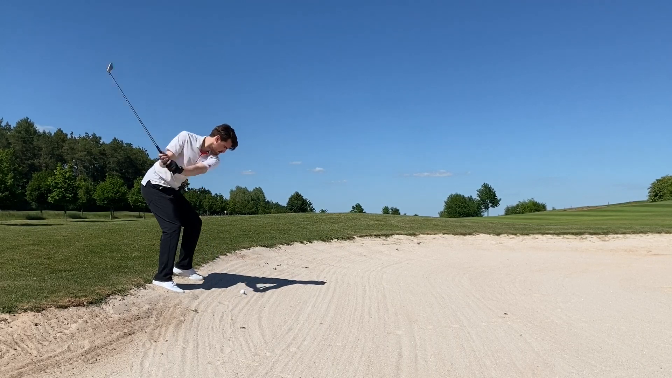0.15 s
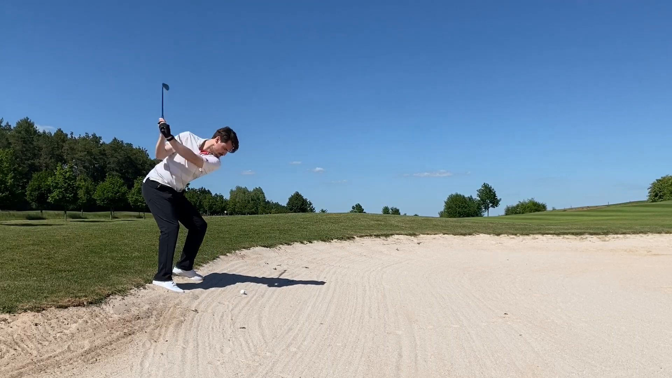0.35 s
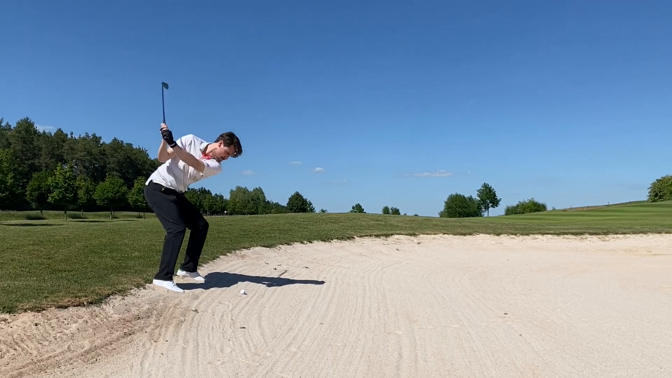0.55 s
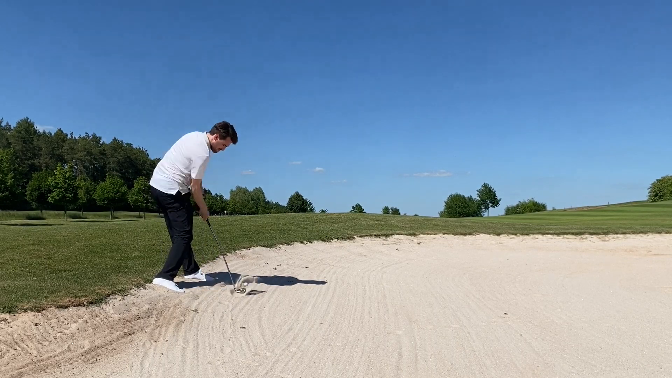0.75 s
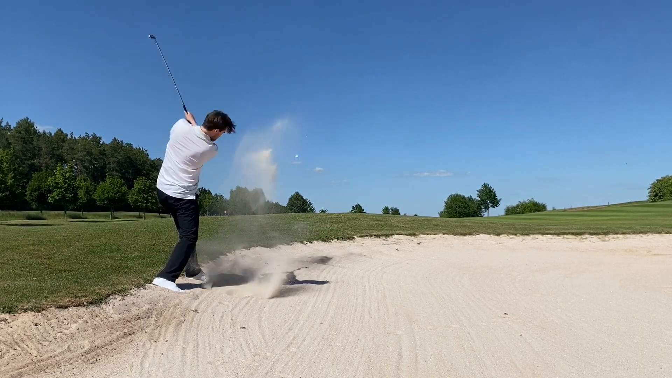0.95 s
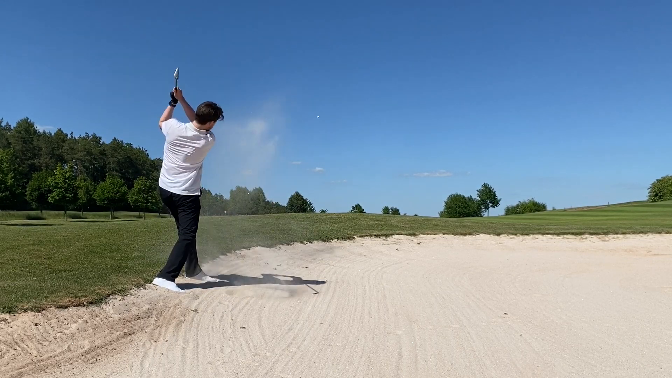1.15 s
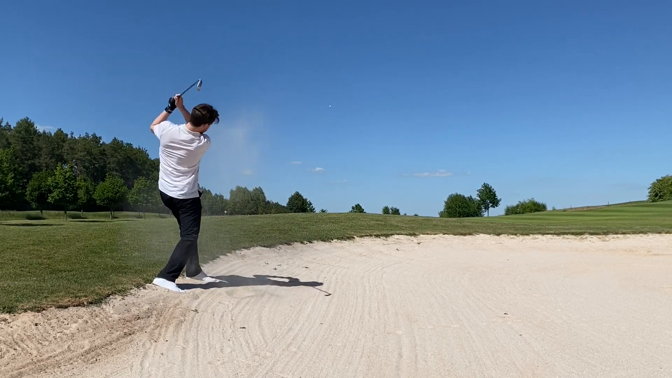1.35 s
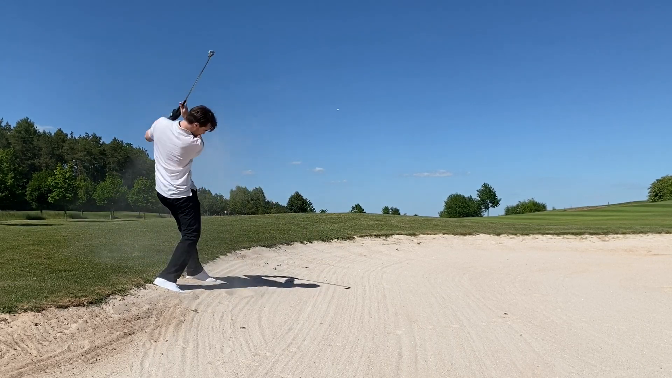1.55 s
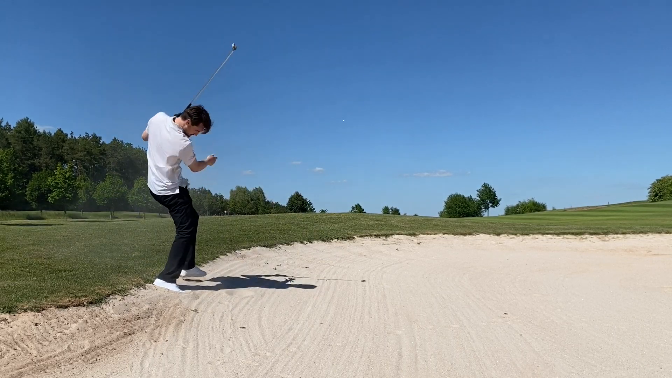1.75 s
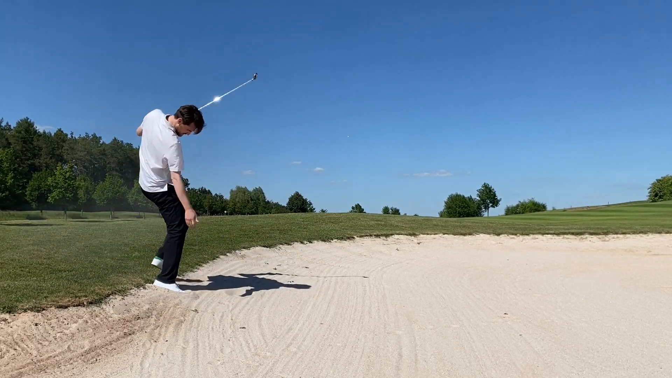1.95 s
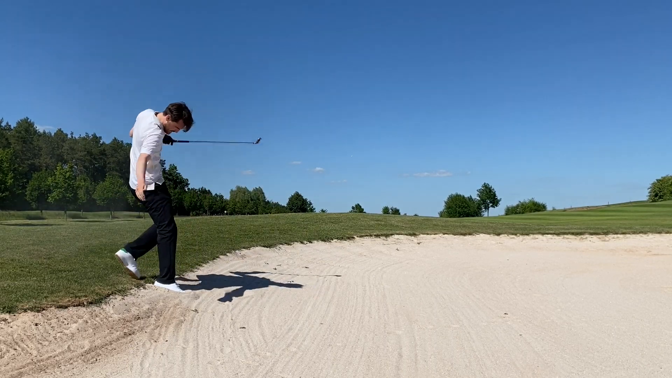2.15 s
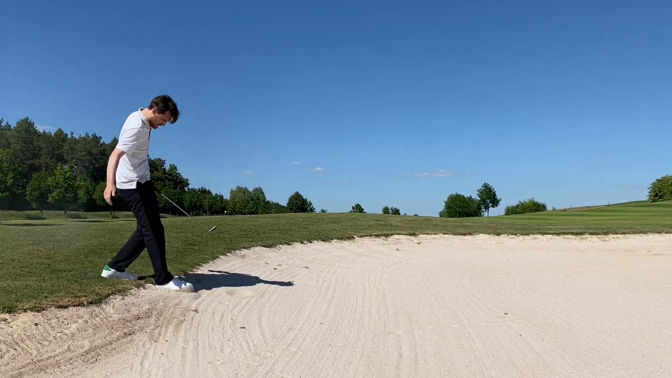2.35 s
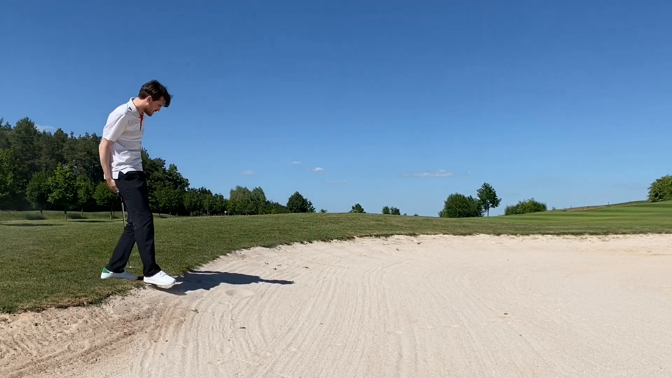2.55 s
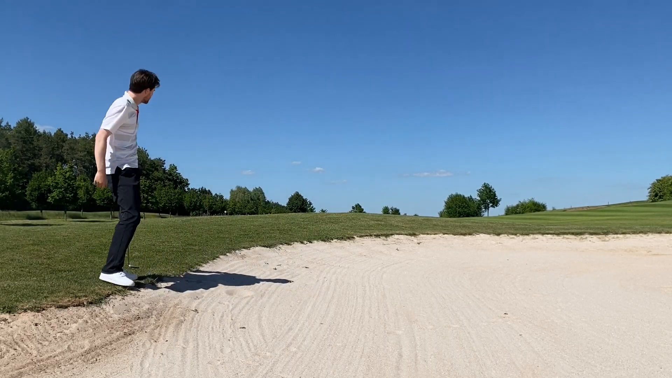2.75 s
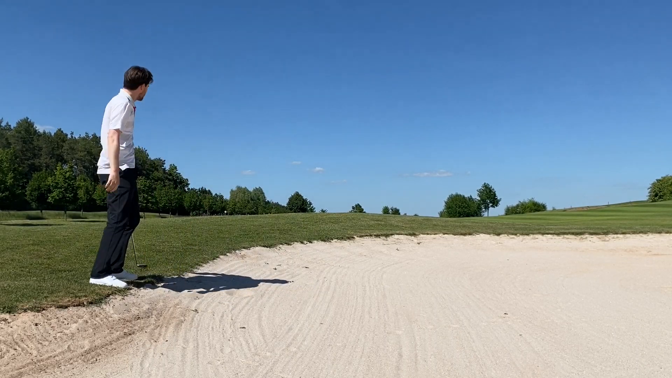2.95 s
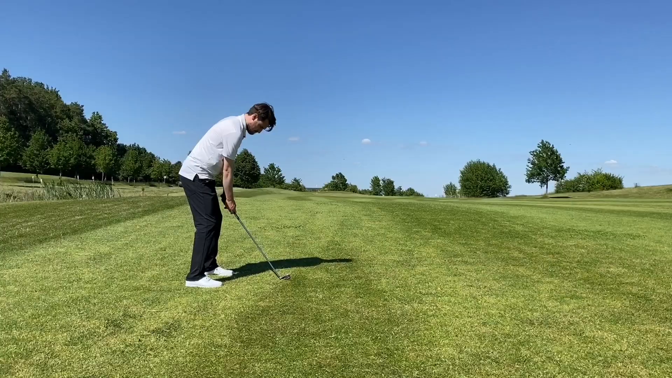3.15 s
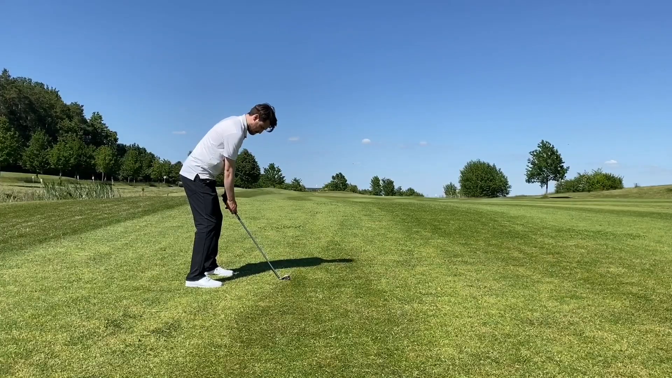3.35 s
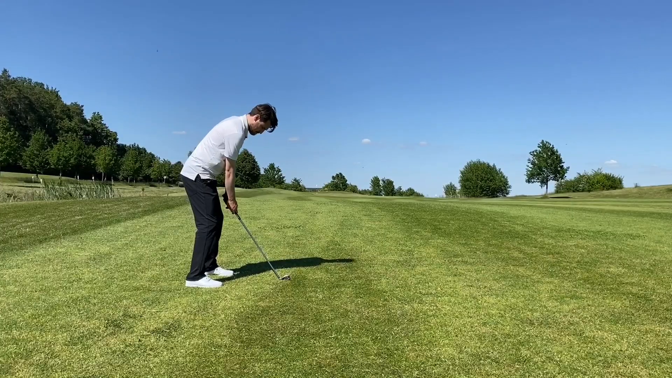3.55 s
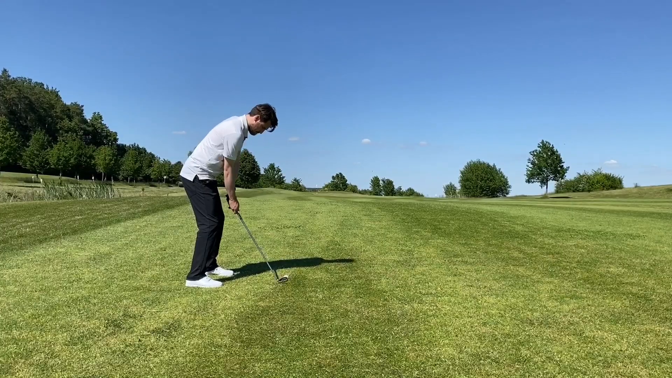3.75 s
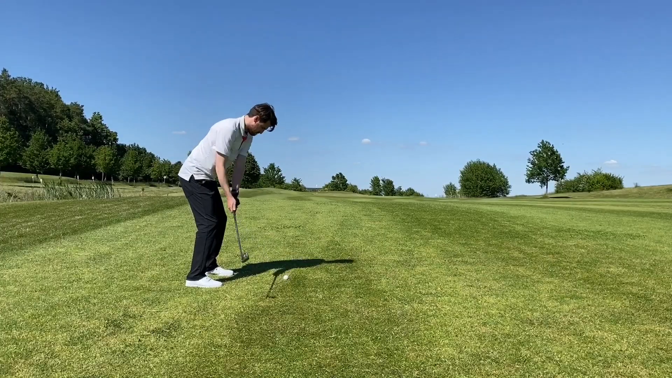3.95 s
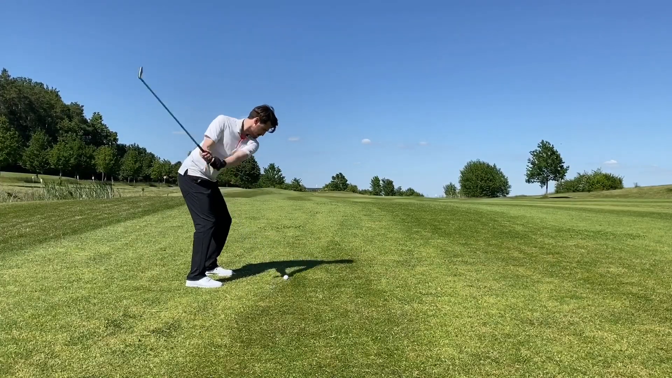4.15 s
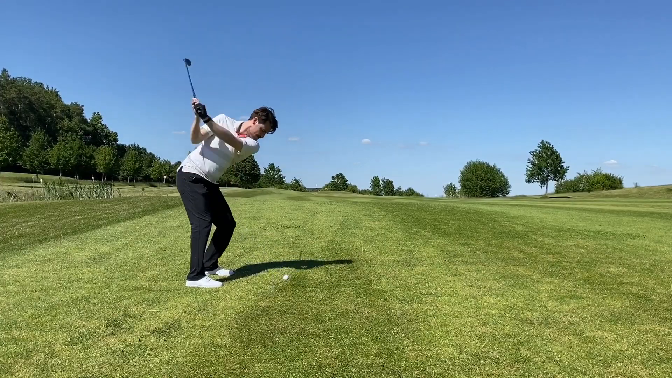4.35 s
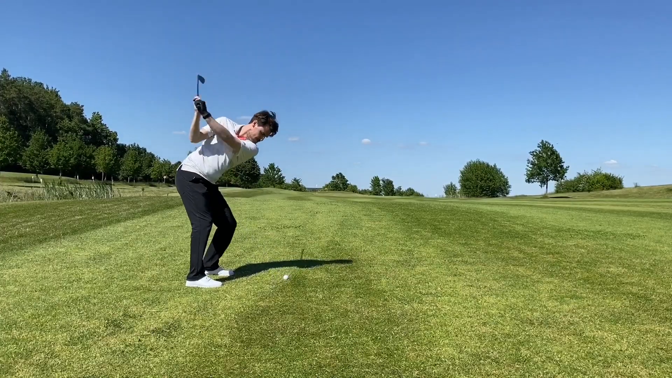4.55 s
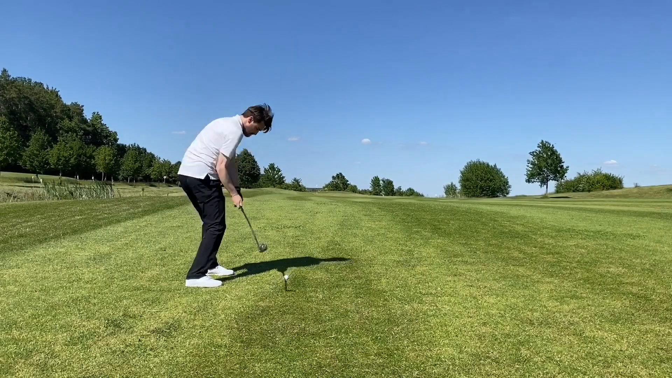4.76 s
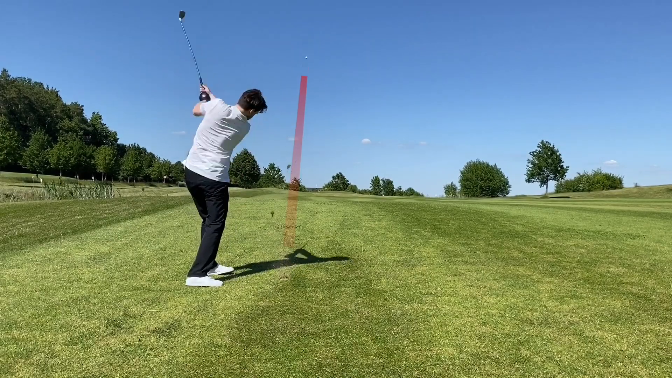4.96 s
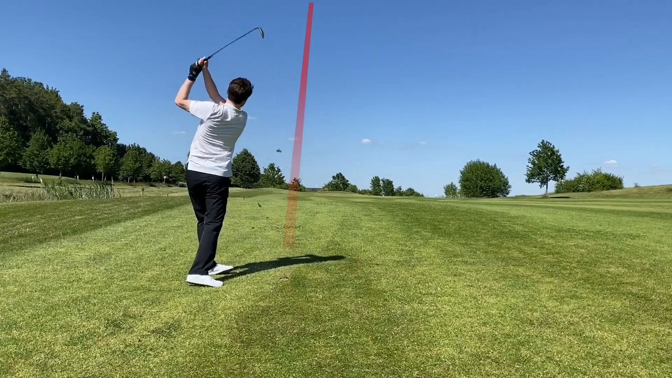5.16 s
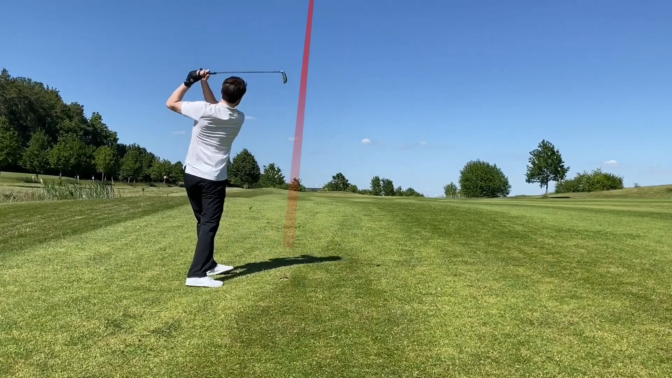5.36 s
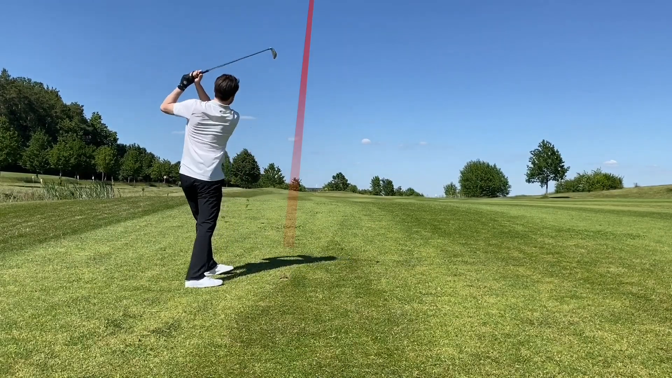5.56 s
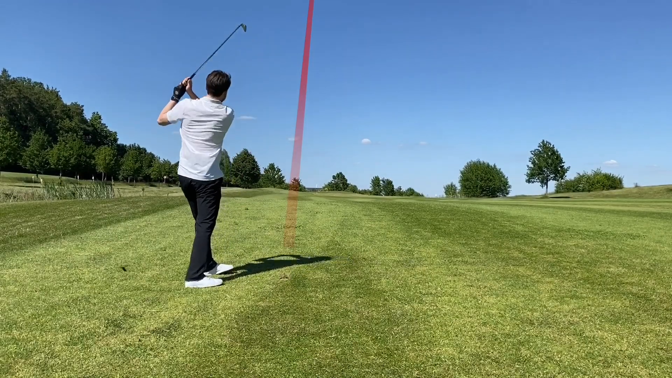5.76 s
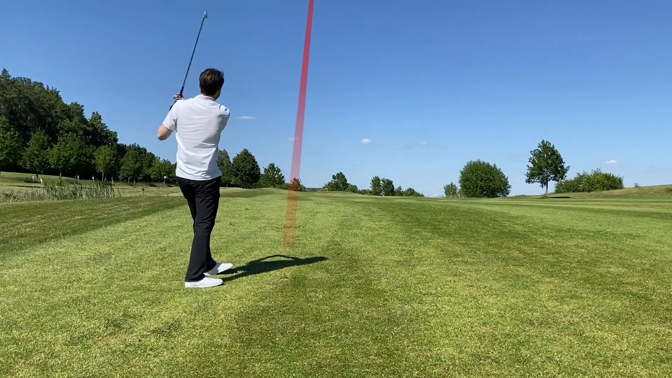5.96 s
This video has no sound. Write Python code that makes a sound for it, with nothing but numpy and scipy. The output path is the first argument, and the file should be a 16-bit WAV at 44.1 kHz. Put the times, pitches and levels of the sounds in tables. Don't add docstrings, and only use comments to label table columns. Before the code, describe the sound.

Two golf shots heard from a few metres away with a handheld stereo microphone. First a short swish and dry clack with a low thud in sand, then falling grains. A muted knock of club on shoe comes midway. Birds whistle and trill faintly over gusting low wind. Finally a louder, brighter click off grass, followed by wind bumps and a light rustle settling into quiet open air.

```python
import sys
import numpy as np
from scipy import signal
from scipy.fft import rfft, irfft, next_fast_len
from scipy.io import wavfile
from scipy.ndimage import uniform_filter1d, map_coordinates

SR = 44100
rng = np.random.default_rng(int(sys.argv[2]) if len(sys.argv) > 2 else 0)


def master(y):
    cut = np.clip(np.atleast_2d(y).T, -1, 1)
    pcm = np.round(cut * 32767)
    wavfile.write(sys.argv[1], SR, pcm.astype(np.int16))


def makeup_ratio(level_db):
    decades = np.asarray(level_db, float) / 20
    return 10 ** decades


N = 264375


def unit(x):
    return x / np.sqrt(np.mean(x ** 2) + 1e-20)


def along(points, hz):
    f, level_db = np.transpose(points)
    return makeup_ratio(np.interp(np.log(hz + 1), np.log(f + 1), level_db, left=-120, right=-120))


def wobble(rate):
    knots = rng.standard_normal(int(N * 100 / SR) + 4)
    return map_coordinates(knots, [np.arange(N) * min(rate, 100) / SR])


def filtered(x, response):
    m = next_fast_len(N + SR // 2)
    return irfft(rfft(x, m) * response(np.fft.rfftfreq(m, 1 / SR)), m)[..., :N]


def grainy(points, spread_db, channels=2):
    raw = rng.standard_normal((channels, N)) * makeup_ratio(spread_db * rng.standard_normal(N))
    return unit(filtered(raw, lambda hz: along(points, hz)))


def add(track, s, piece):
    part = track[round(s * SR):][:len(piece)]
    part += piece[:len(part)]


def trees():
    # (frequency [Hz], level [dB per Hz])
    sand_pit = [(150, -29), (250, -2), (455, -2.5), (619, -13), (1200, -13), (1300, -22.5), (1510, -10),
                (3230, -18.5), (6080, -39), (8000, -38), (12000, -38.5), (15600, -67.5), (22000, -120)]
    open_grass = [(150, -37), (250, -13), (363, -1), (600, -7.5), (740, -9.5), (1640, -22.5), (3080, -19.5),
                  (4770, -23), (6590, -30), (7880, -39), (12000, -42), (15600, -66.5), (22000, -120)]
    at_sand = np.arange(N) < 3.058 * SR
    hiss = np.where(at_sand, makeup_ratio(-2.0) * grainy(sand_pit, 1.5), makeup_ratio(0.5) * grainy(open_grass, 0.55))
    breath_db = 1.2 * wobble(0.8) + 0.55 * wobble(3.2) + 0.8 * wobble(9.2)
    return makeup_ratio(-74.5 + breath_db) * hiss


def wind():
    # (time [s], strength [dB])
    breeze = [(0, -61), (.3, -60.5), (.6, -55.5), (0.781, -54.5), (0.919, -61.5), (1.03, -50.5), (1.3, -56),
              (1.7, -55.5), (1.97, -47.5), (2.55, -51.5), (2.77, -57.5), (3.0, -54.5), (3.5, -44),
              (3.95, -53), (4.4, -52.5), (4.62, -49.5), (5.1, -48), (5.5, -55.5)]
    # (time [s], half width [s], rise [dB], extra rise of the small eddies [dB])
    gusts = [(3.66, .05, 6, -1), (3.745, .05, 7, 11), (4.0, .12, -3, -11), (4.79, .035, 11, -4),
             (4.88, .025, 9, -5), (5.05, .1, 0.5, -7), (5.95, .25, 8, -2), (1.16, .06, -1, -5),
             (4.33, .05, 3, 4), (3.21, .03, 4, 4), (2.9, .07, 0, 2), (1.21, .03, 5, 2), (.67, .03, 4, 0),
             (5.42, .12, -1, -4)]
    # (time [s], peak [dB], width [ms])
    kicks = [(0.224, -43.5, 1.63), (0.259, -47.5, 2.5), (0.279, -54, 1.7), (0.466, -50.5, 1.6),
             (0.478, -46.5, 1.14), (1.378, -50, 1.65), (1.397, -44, 1.53), (1.991, -43.5, 1.2),
             (2.124, -44.5, 1.67), (2.242, -45.5, 1.8), (2.53, -44.5, 1.07), (2.585, -43, 1.28),
             (3.287, -41.5, 1.8), (3.693, -43.5, 1.05), (3.746, -37, 2.2), (3.882, -44.5, 1.9),
             (4.201, -44.5, 1.13), (4.515, -39, 3.2), (4.764, -35, 1.65), (4.779, -37, 1.56),
             (4.789, -32, 5.1), (4.81, -38.5, 4.5), (4.88, -30, 2.7), (4.9010, -20, 1.485),
             (5.045, -29.5, 2.48), (5.817, -43.5, 2.06)]
    flicks = [(0.989, -56.5, 1.35), (1.062, -49, 1.44), (1.198, -66, 1.3), (1.682, -53.5, 1.35),
              (1.804, -50, 1.6), (1.883, -50, 1.45), (1.935, -46, 1.46), (2.176, -52, 1.23),
              (2.298, -52.5, 1.17), (2.599, -44, 1.12), (2.619, -51, 1.4), (2.93, -53, 1.3),
              (2.953, -53, 1.34), (3.196, -42, 1.6), (3.383, -46.5, 1.32), (3.448, -48.5, 1.44),
              (3.496, -54, 1.4), (3.544, -51, 1.5), (3.588, -40, 1.24), (3.72, -41, 1.3),
              (4.031, -54, 1.75), (4.178, -52, 1.53), (4.283, -51, 1.25), (4.386, -56, 1.5),
              (4.844, -43.5, 1.33), (5.24, -57, 2)]
    # (frequency [Hz], level [dB])
    slow_eddies = [(20, -27), (40, 0.5), (65, 0), (110, -8), (170, -16.5), (260, -40.5)]
    small_eddies = [(80, -33), (140, -9), (200, -1), (300, -8.5), (430, -16.5), (650, -32), (1000, -68.5)]

    strength_db = np.interp(np.arange(N) / SR, *np.transpose(breeze))
    mean_db = strength_db.mean()
    small_db = -68.5
    for s, width, db, extra_db in gusts:
        bump = np.exp(-((np.arange(N) / SR - s) / width) ** 2)
        strength_db = strength_db + db * bump
        small_db = small_db + extra_db * bump

    lumps = wobble(13)
    slow = unit(makeup_ratio(3.1 * lumps) * grainy(slow_eddies, 9, channels=1)[0])
    small = unit(makeup_ratio(1.8 * lumps + 4.4 * wobble(40)) * grainy(small_eddies, 9, channels=1)[0])
    small_gain = makeup_ratio(small_db + 1.217 * (strength_db - mean_db))
    x = makeup_ratio(strength_db) * slow + small_gain * small

    t = np.arange(-600, 600) / SR
    for s, db, width_ms in list(kicks) + list(flicks):
        pulse = np.exp(-(t / (width_ms / 1000)) ** 2)
        add(x, s - 600 / SR, makeup_ratio(db + 9.0) * pulse)
    return x


def whistle(hz, gain):
    phase = 2 * np.pi * np.cumsum(hz) / SR
    return np.sqrt(2) * gain * signal.windows.tukey(len(hz), .6) * np.sin(phase)


def warbler_notes(x):
    # (time [s], length [s], start pitch [Hz], held pitch [Hz], level [dB])
    warbles = [(0.102, 0.062, 3763, 3250, -74.5), (0.331, 0.12, 3720, 2907, -72.5),
               (0.528, 0.12, 3700, 3239, -72), (0.991, 0.07, 3646, 3245, -76),
               (1.467, 0.16, 3507, 3215, -78), (2.449, 0.06, 3352, 3090, -74),
               (2.674, 0.033, 3220, 2850, -71.5), (4.923, 0.08, 3440, 3165, -78.5),
               (5.471, 0.068, 3190, 3110, -78), (5.726, 0.096, 3500, 2990, -74.5),
               (5.956, 0.044, 3400, 3150, -77)]
    slide_s, fade_db_per_s = .036, 89.5
    for s, length, from_hz, held_hz, db in warbles:
        t = np.arange(0, length, 1 / SR)
        left = np.clip(1 - t / slide_s, 0, 1)
        fade_db = fade_db_per_s * np.maximum(t - slide_s, 0)
        add(x, s, whistle(held_hz + (from_hz - held_hz) * left, makeup_ratio(db - fade_db)))


def thrush_notes(x):
    # (time [s], length [s], start pitch [Hz], middle pitch [Hz], end pitch [Hz])
    arches = [(3.351, 0.036, 3920, 2790, 2820), (3.394, 0.043, 2934, 3340, 2940),
              (3.428, 0.026, 3030, 2800, 2680), (3.655, 0.025, 2160, 2470, 2750),
              (3.68, 0.027, 2014, 2860, 3030), (3.697, 0.033, 3030, 2870, 2620),
              (3.912, 0.019, 2610, 2390, 1910), (3.958, 0.046, 1770, 2185, 1650),
              (4.139, 0.014, 2150, 2430, 2800), (4.161, 0.019, 1940, 2804, 2970),
              (4.183, 0.019, 3030, 3010, 2860)]
    for s, length, from_hz, mid_hz, to_hz in arches:
        u = np.linspace(-1, 1, round(length * SR))
        slope = (to_hz - from_hz) / 2
        bend = (to_hz + from_hz) / 2 - mid_hz
        add(x, s, whistle(mid_hz + slope * u + bend * u ** 2, makeup_ratio(-68.5 + 0.5 * u ** 2)))


def trill_notes(x):
    # (time [s], notes [count], spacing [s], first top [Hz], last top [Hz], fall [ratio], level [dB])
    trains = [
        (3.732, 7, .0192, 2750, 2250, .76, -68),
        (4.216, 6, .0205, 2700, 2300, .78, -70),
        (3.945, 4, .016, 3200, 2900, .88, -75),
    ]
    for s, notes, spacing, first_hz, last_hz, fall, db in trains:
        for k in range(int(notes)):
            top_hz = last_hz + (first_hz - last_hz) * .3 ** k
            hz = top_hz * np.linspace(1, fall, round(.65 * spacing * SR))
            add(x, s + k * spacing, whistle(hz, makeup_ratio(db - .5 * k)))


def far_glides(x):
    # (time [s], length [s], start pitch [Hz], end pitch [Hz], level [dB])
    sweeps = [(.35, .07, 7800, 6700, -90), (.505, .02, 5000, 7800, -82), (.515, .025, 4700, 6000, -80),
              (.533, .017, 4900, 6100, -81), (1.87, .02, 3300, 4500, -82), (1.965, .03, 3000, 4500, -82),
              (2.583, .022, 5300, 2900, -75), (2.729, .015, 4800, 2700, -75), (2.738, .01, 5000, 3700, -79),
              (2.7, .03, 2750, 3050, -79), (2.79, .035, 5600, 4700, -76), (2.52, .025, 2900, 3300, -80),
              (2.822, .015, 4900, 2800, -72), (3.342, .012, 4900, 4000, -80),
              (3.325, .025, 3600, 4300, -83), (4.29, .05, 2600, 2400, -76), (4.23, .05, 3000, 2850, -79),
              (3.73, .03, 2800, 3000, -79), (.205, .06, 3350, 2850, -80), (.27, .045, 3960, 3680, -77),
              (.308, .014, 3700, 3200, -78), (.326, .014, 3250, 3750, -79), (0, .03, 2900, 2950, -84),
              (.075, .05, 2950, 2950, -86), (.085, .03, 3850, 3750, -86), (3.905, .03, 3150, 3200, -83),
              (3.82, .05, 3250, 3500, -86), (3.36, .05, 3700, 4200, -85), (1.2, .07, 3315, 2900, -81),
              (4.487, .016, 3450, 3150, -82), (3.44, .065, 3250, 3340, -80), (5.26, .07, 2330, 2460, -82),
              (5.31, .16, 2490, 2510, -80), (5.57, .05, 3100, 3050, -87), (5.71, .08, 3550, 3500, -87),
              (5.92, .03, 4300, 3800, -85)]
    for s, length, from_hz, to_hz, db in sweeps:
        add(x, s, whistle(np.linspace(from_hz, to_hz, round(length * SR)), makeup_ratio(db)))


def chatter(x):
    # (time [s], length [s], level [dB])
    calls = [
        (3.12, .17, -77),
        (3.515, .07, -80),
        (3.2, .4, -85),
        (5.17, .2, -87),
        (2.82, .06, -84),
        (.66, .08, -84),
        (1.86, .07, -94),
    ]
    band = [(3700, -28), (4400, -7.5), (4800, 7), (5200, -15), (5900, -14.5)]  # ([Hz], [dB])
    buzz = grainy(band, 3, channels=1)[0] * makeup_ratio(4.5 * wobble(70))
    for s, length, db in calls:
        n = round(length * SR)
        add(x, s, makeup_ratio(db) * np.hanning(n) * buzz[round(s * SR):][:n])


def birds():
    x = np.zeros(N)
    for sing in (warbler_notes, thrush_notes, trill_notes, far_glides, chatter):
        sing(x)
    t = np.arange(SR // 3) / SR
    decay = makeup_ratio(-60 * t / 0.13) + makeup_ratio(-3 - 60 * t / .55)
    tail = rng.standard_normal((2, len(t))) * decay
    wet = signal.fftconvolve(x[None], tail / np.linalg.norm(tail[0]), axes=1)[:, :N]
    direct = x * makeup_ratio(1.2 + 1.8 * wobble(45))
    return direct * [[1], [.6]] + makeup_ratio(-3.5) * wet


def swell(s, rise, hold, fall, db):
    times = np.cumsum([s - abs(rise), abs(rise), abs(hold), abs(fall)])
    levels = [db - 40, db, db, db - 40]
    return makeup_ratio(np.interp(np.arange(N) / SR, times, levels, left=-200, right=-200))


def shares(levels_db):
    return makeup_ratio(np.array(levels_db, float))[:, None]


def swings():
    # (time of full speed [s], rise [s], hold [s], level [dB])
    strokes = [
        (0.637, 0.58, 0.089, -74.5),
        (0.773, 0.13, 0.047, -59.5),
        (4.614, 0.047, 0.043, -58),
    ]
    mix = shares([0, -10.5, -36, -38])
    return sum(mix * swell(s, rise, hold, 0.036, db) for s, rise, hold, db in strokes)


def scuffs():
    # (time [s], hold [s], level [dB], grit [dB])
    rubs = [(0.532, 0.015, -102, -25), (1.267, 0.057, -73.5, -14.5), (1.463, 0.037, -80.5, -34.5),
            (1.694, 0.37, -92, -24), (2.66, 0.32, -87.5, -26), (4.046, 0.34, -98, -30),
            (2.228, 0.14, -75.5, -23), (2.827, 0.06, -85.5, -15), (3.074, .04, -94, -25.5),
            (3.573, 0.058, -78.5, -34), (4.47, 0.062, -87.5, -25), (4.909, 0.028, -78.5, -18),
            (5.13, 0.081, -92, -12), (5.714, 0.023, -94, -9), (5.83, 0.027, -100, 4)]
    gains = 0
    for s, hold, db, grit_db in rubs:
        gains = gains + shares([0, -10.5, grit_db, grit_db + 4]) * swell(s, 0.095, hold, 0.11, db)
    return gains


def sprays():
    # (time [s], hold [s], fall [s], level [dB], grit [dB])
    throws = [
        (0.805, 0.17, 0.4, -69, -5),
        (1.039, 0.04, 0.22, -81, 2),
        (2.558, 0.023, 0.2, -73.5, -11.5),
        (4.646, 0.058, 0.38, -68, -6),
    ]
    gains = 0
    for s, hold, fall, db, grit_db in throws:
        gains = gains + shares([0, -3, grit_db, grit_db - 1.1]) * swell(s, .12, hold, fall, db)
    return gains


def clouds():
    # (time [s], hold [s], level [dB])
    drifts = [
        (1.152, 1.24, -88.5),
        (2.864, 0.13, -93),
        (5.12, 0.43, -92),
    ]
    mix = shares([-np.inf, -np.inf, -13, 0])
    return sum(mix * swell(s, .3, hold, .3, db) for s, hold, db in drifts)


def motion():
    # (swish [dB], rustle [dB], grit [dB], dust [dB])
    at_rest = (-90.5, -89.5, -105, -117)
    # (frequency [Hz], level [dB])
    swish_band = [(300, -34), (500, 3), (1000, -1.5), (2000, -3.5), (3000, -7), (4200, -24.5)]
    rustle_band = [(2200, -20), (3200, 1.5), (4500, -0.5), (6200, -5.5), (7500, -17)]
    grit_band = [(5500, -16), (7200, -1), (10500, -2), (12000, -1), (13500, -26.5)]
    dust_band = [(10500, -28.5), (12500, -10), (13800, -4.5), (14800, 0.5), (15700, 1.5)]

    gains = shares(at_rest) * np.ones(N) + swings() + scuffs() + sprays() + clouds()
    swish, rustle, grit, dust = gains
    x = swish * makeup_ratio(3.0 + 1.6 * wobble(30)) * grainy(swish_band, 4) * makeup_ratio([[0], [-3]])
    x = x + rustle * makeup_ratio(-0.1 + 1.4 * wobble(40)) * grainy(rustle_band, 2)
    x = x + grit * makeup_ratio(0.5 * wobble(60)) * grainy(grit_band, 2.5)
    return x + dust * makeup_ratio(1.5 * wobble(60)) * grainy(dust_band, 4.4)


def club():
    # (time [s], level [dB], ring [Hz], t60 [s], crack [dB])
    blows = [(0.8141, -13.5, 1570, 0.0023, -44), (0.8140, -29.5, 3940, 0.0021, -51),
             (0.8166, -23, 840, 0.012, -44), (0.8177, -31, 2000, .006, -48),
             (0.8198, -29, 2700, 0.005, -48), (.8218, -33, 1618, 0.002, -66.5),
             (2.5510, -44, 2140, 0.01, -52), (2.55, -40, 1250, 0.0055, -58),
             (2.5539, -29.5, 1650, 0.01, -52), (2.5530, -28, 840, 0.016, -46),
             (2.5539, -32, 670, .016, -62), (2.5543, -35, 2500, 0.0066, -44),
             (2.5560, -44, 3660, .012, -53), (2.558, -29, 1720, 0.0079, -48),
             (2.5575, -50, 6040, 0.0073, -67), (2.5601, -34.5, 944, 0.0058, -51),
             (4.6638, -17, 1870, .004, -30), (4.6645, -24, 3270, 0.0057, -33.5),
             (4.6651, -18.5, 1467, 0.011, -40), (4.6657, -23, 965, 0.013, -35),
             (4.6674, -22, 2600, 0.006, -31), (4.682, -46.5, 5600, 0.0045, -49.5),
             (4.9130, -73, 3000, 0.0019, -63), (4.9210, -60, 3000, 0.0049, -63),
             (4.926, -59, 3300, 0.0042, -51.5), (2.382, -53, 743, 0.014, -77),
             (4.6657, -34, 6950, .004, -33), (4.6640, -30, 4160, 0.0092, -49.5),
             (4.6636, -19, 15300, .0015, -39.5), (4.6626, -33, 1500, 0.0033, -52)]
    # (time [s], level [dB], frequency [Hz], t60 [s])
    head_modes = [
        (0.8139, -32.5, 10110, .0115),
        (.8171, -22.5, 10440, 0.0105),
        (4.6801, -50.5, 5810, 0.0105),
    ]
    # (time [s], level [dB], frequency [Hz], t60 [s])
    thuds = [(.8141, -20, 300, 0.025), (.8152, -28, 420, .022), (1.49, -66, 1620, .07),
             (.8151, -21.5, 158, 0.034), (.757, -45.5, 381, 0.09), (0.795, -51, 540, 0.079),
             (.836, -43.5, 261, 0.17), (0.862, -46.5, 300, 0.067), (0.75, -51, 331, 0.046),
             (4.6641, -20, 360, 0.026), (4.6641, -18, 201, 0.022), (4.6661, -24, 170, 0.049),
             (4.642, -42.5, 480, 0.06), (4.1, -52.5, 360, .051), (4.688, -49, 351, 0.18),
             (5.3, -52.5, 310, .12), (1, -57, 500, 0.072)]
    # (time [s], peak [dB], width [ms])
    snaps = [
        (4.66388, -9, .014),
        (4.66449, -6, .012),
    ]
    # (time [s], peak [dB], width [ms])
    pushes = [
        (4.6655, -25, 1.1),
        (.8165, -36, 1.2),
    ]

    x, t = np.zeros(N), np.arange(5000) / SR
    for s, db, hz, t60, crack_db in blows:
        build_up = 1 - np.exp(-t * hz / 0.27)
        ring = makeup_ratio(db + 2.0 - 60 * t / t60) * build_up * np.sin(2 * np.pi * hz * t)
        snap = makeup_ratio(crack_db - 60 * t / .004)
        flying_bits = makeup_ratio(crack_db - 17 - 60 * t / .025)
        add(x, s, ring + (snap + flying_bits) * rng.standard_normal(len(t)))
    for s, db, width_ms in list(snaps) + list(pushes):
        pulse = np.exp(-((t[:600] - 300 / SR) / (width_ms / 1000)) ** 2)
        add(x, s - 300 / SR, makeup_ratio(db) * pulse)
    for s, db, hz, t60 in list(head_modes) + list(thuds):
        decay = makeup_ratio(db - 60 * t / t60) * (1 - np.exp(-t / .0012))
        add(x, s, decay * np.sin(2 * np.pi * hz * t))
    return x


def patchy(x, depth_db):
    z = signal.stft(x, nperseg=512)[2]
    field = uniform_filter1d(rng.standard_normal(z.shape[1:]), size=4, axis=0)
    field = uniform_filter1d(field, size=8, axis=1)
    return signal.istft(z * makeup_ratio(depth_db * unit(field) - .3), nperseg=512)[1][:, :N]


def scene():
    # (frequency [Hz], level [dB])
    diffuse_side = [(150, -55.5), (250, -25.5), (400, -7.5), (700, 6), (1300, 3.5), (2400, -4), (5000, 0.5),
                    (10500, 0.5), (11500, -20), (16000, -26.5)]
    # (frequency [Hz], level [dB])
    player_side = [(100, -34.5), (200, -23.5), (350, -10), (800, -13.5), (2000, -19.5), (4000, -27.5),
                   (8000, -35.5)]
    player_quadrature = [(300, -30.5), (600, -11), (1200, -8), (2500, -12), (4500, -9), (9000, 1),
                         (13000, -10.5), (15000, -23)]

    hits = club()
    mid, side = patchy(trees() + motion(), depth_db=1.6) + birds()
    side = filtered(side, lambda hz: along(diffuse_side, hz))
    side = side + filtered(hits, lambda hz: along(player_side, hz) + 1j * along(player_quadrature, hz))
    mid = mid + hits + wind()
    return np.array([mid + side, mid - side])


def top_cut(x):
    return signal.sosfilt(signal.butter(12, 17070, fs=SR, output="sos"), x)


def record(dry):
    def response(hz):
        bass_cut = (1j * hz / (45 + 1j * hz)) ** 2
        lag = np.exp(-2j * np.pi * 1.6 * np.log((hz + 25.5) / (hz + 601)))
        return bass_cut * lag / (1 + (hz / 16000) ** 60)
    return top_cut(filtered(dry, response))


dry = scene()
out = record(dry)
master(out)
```